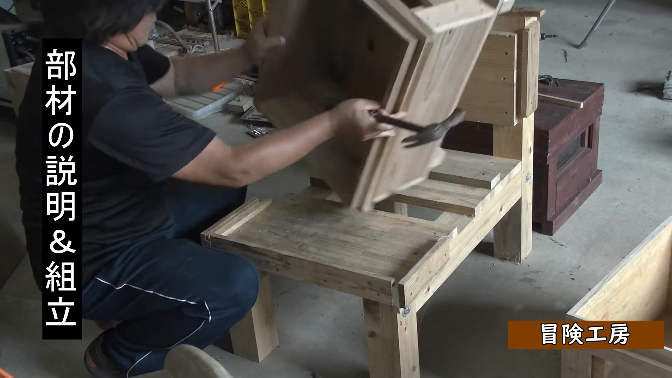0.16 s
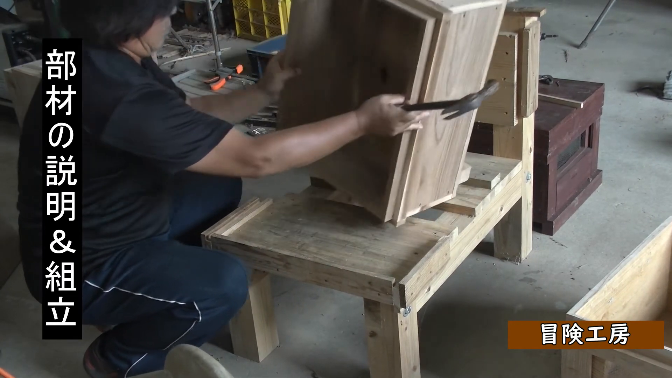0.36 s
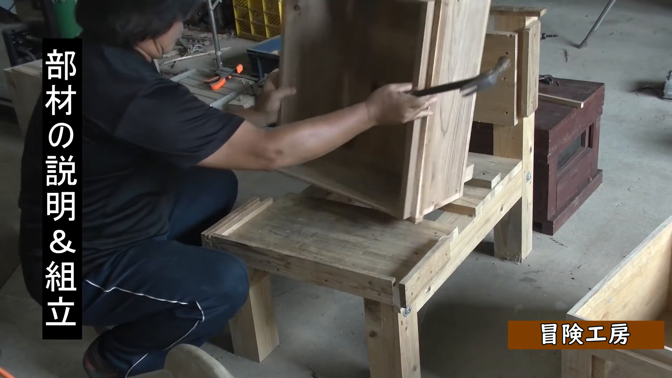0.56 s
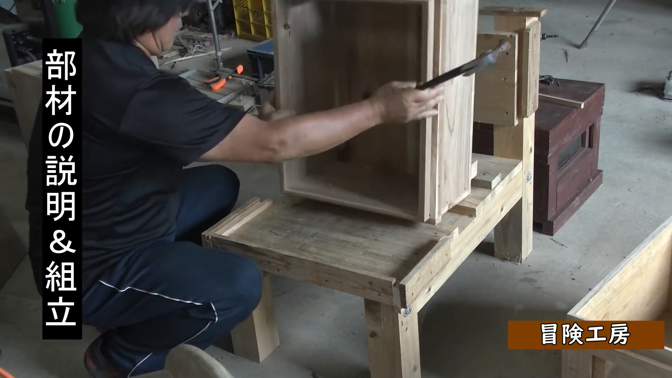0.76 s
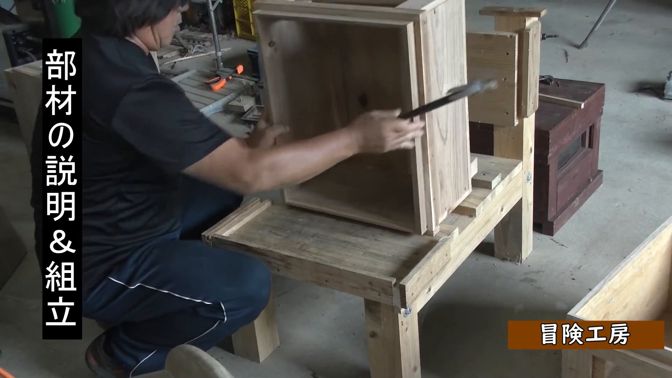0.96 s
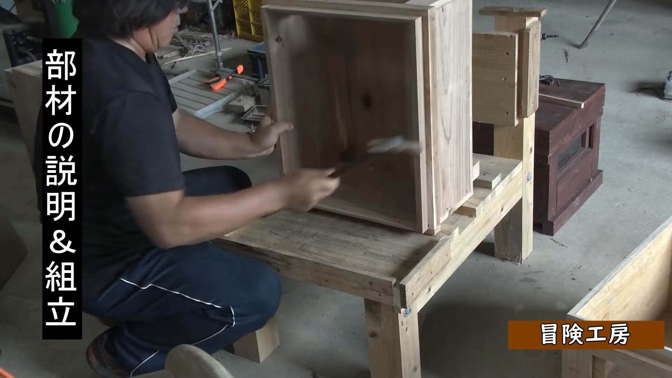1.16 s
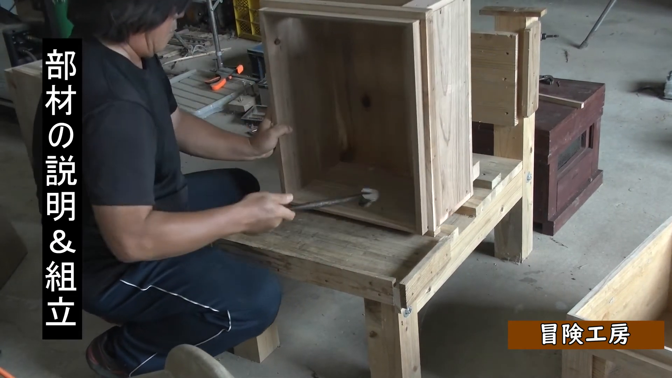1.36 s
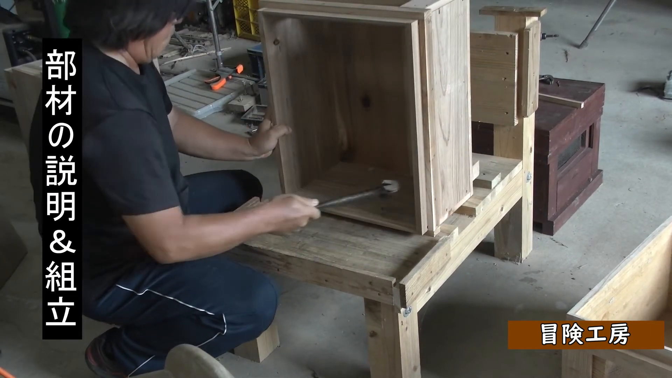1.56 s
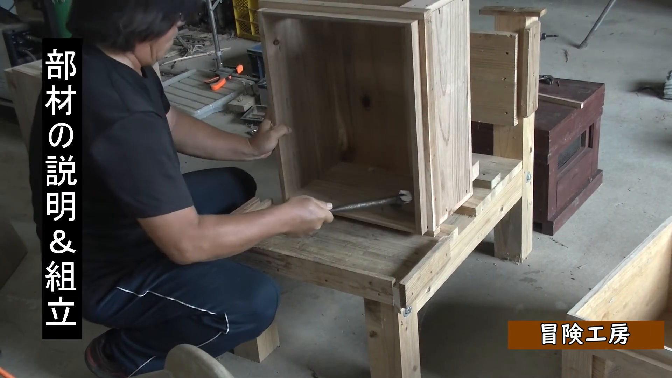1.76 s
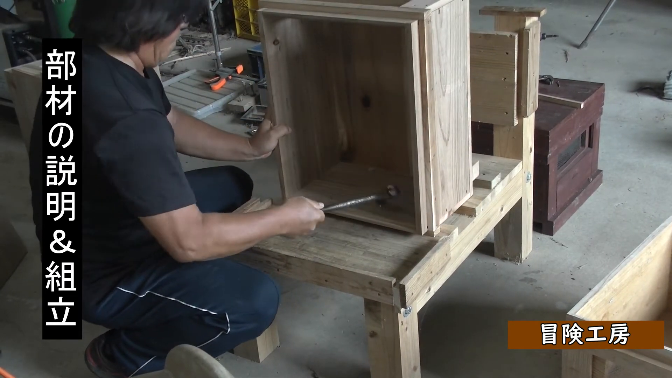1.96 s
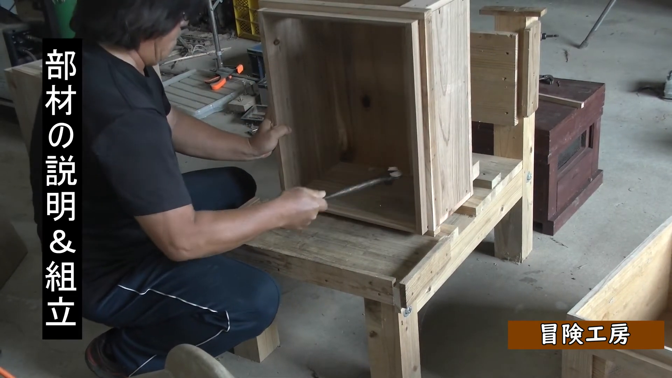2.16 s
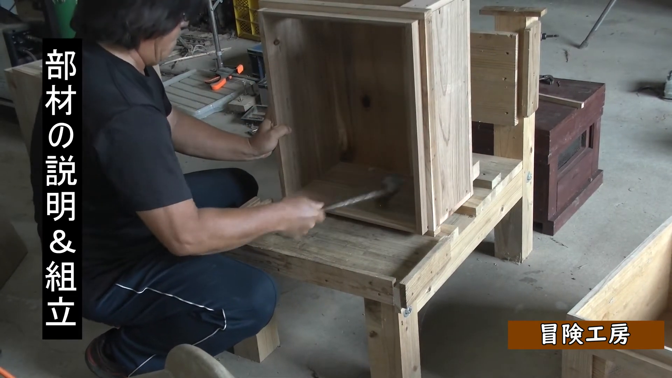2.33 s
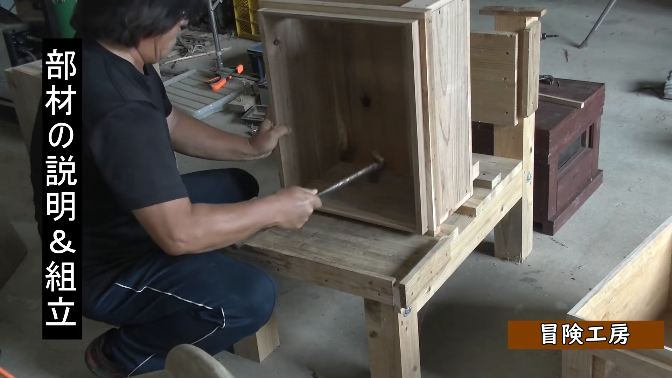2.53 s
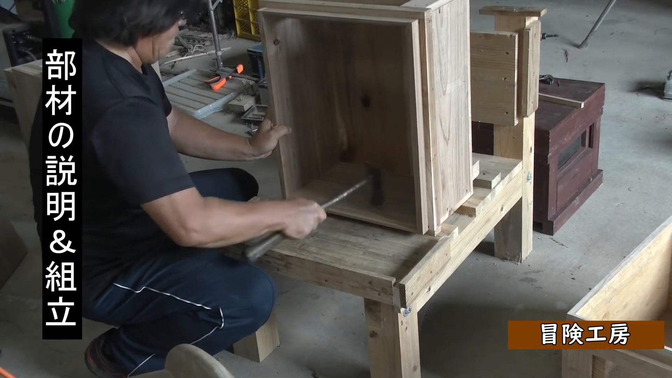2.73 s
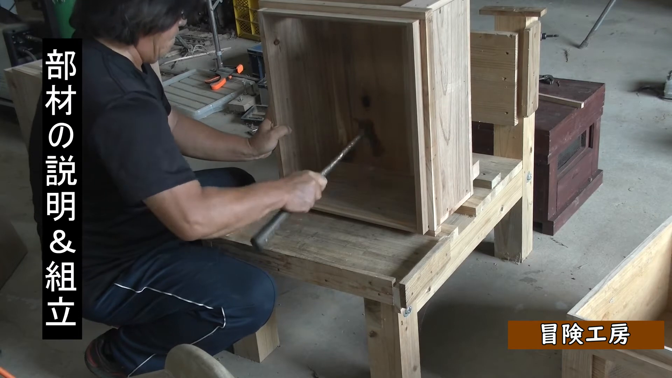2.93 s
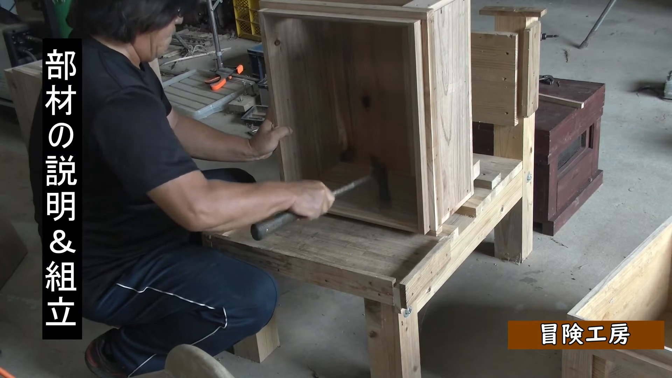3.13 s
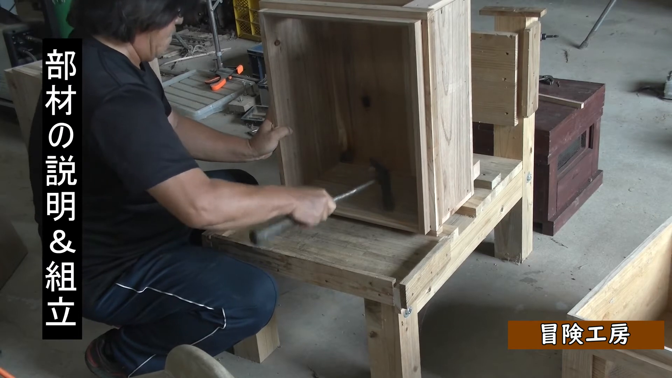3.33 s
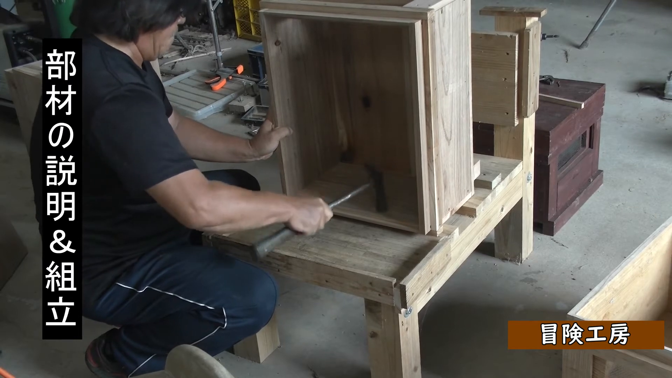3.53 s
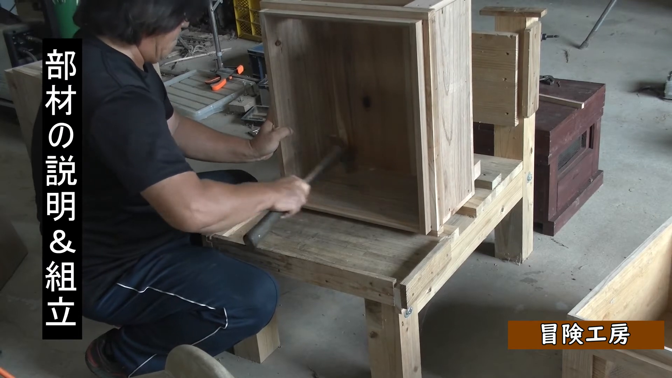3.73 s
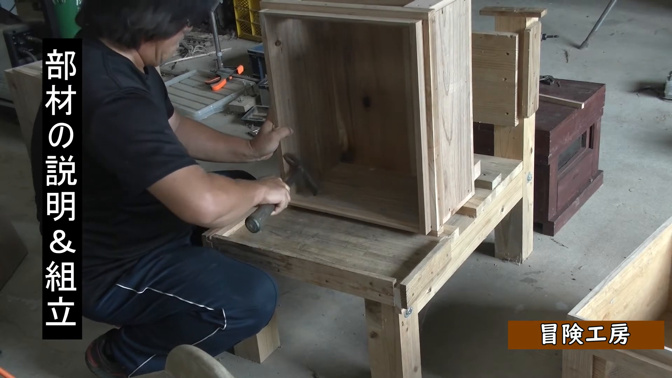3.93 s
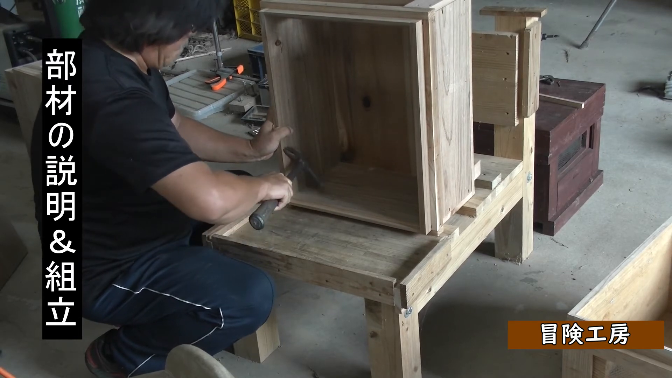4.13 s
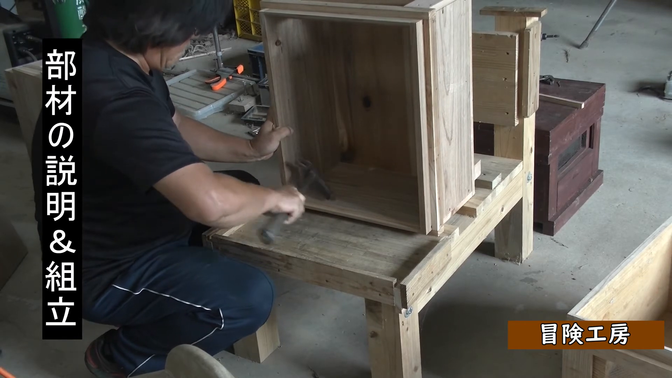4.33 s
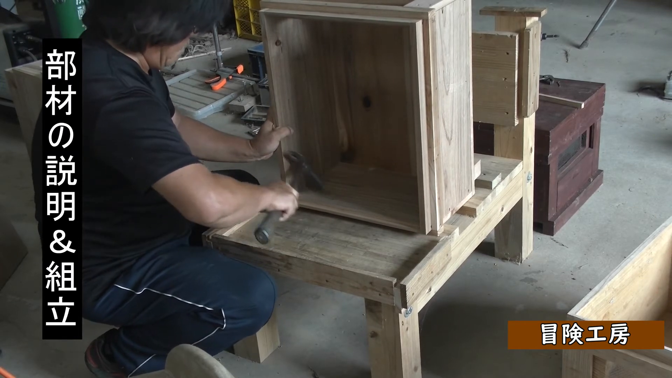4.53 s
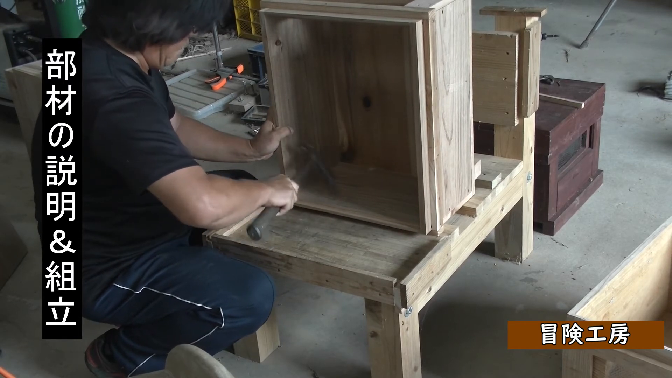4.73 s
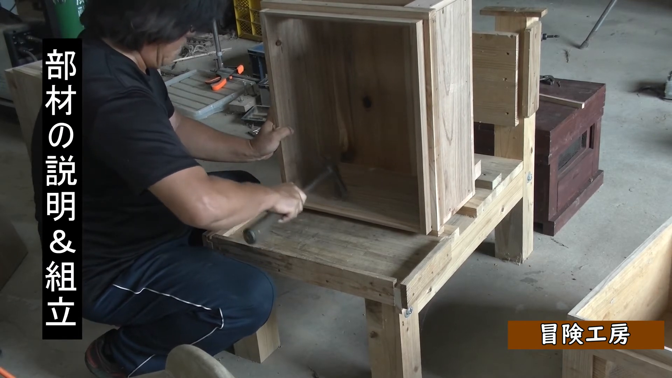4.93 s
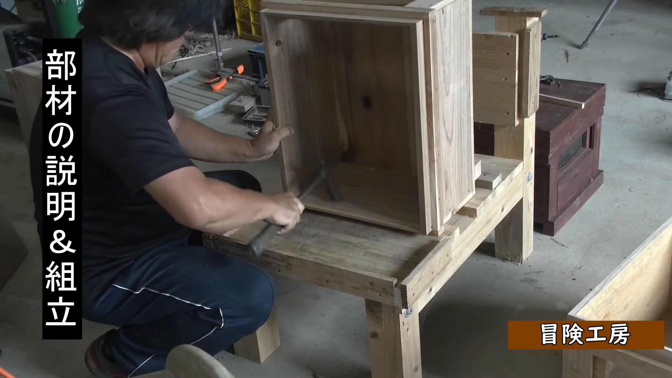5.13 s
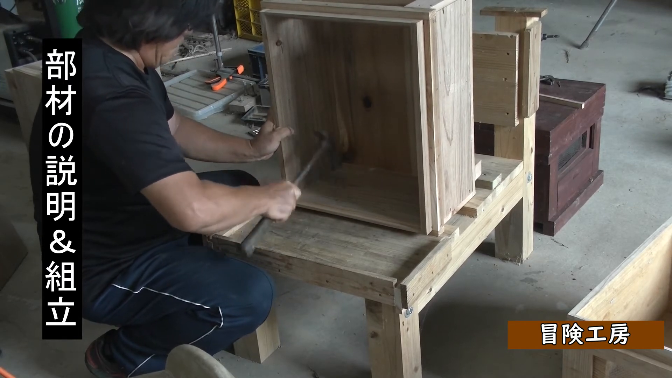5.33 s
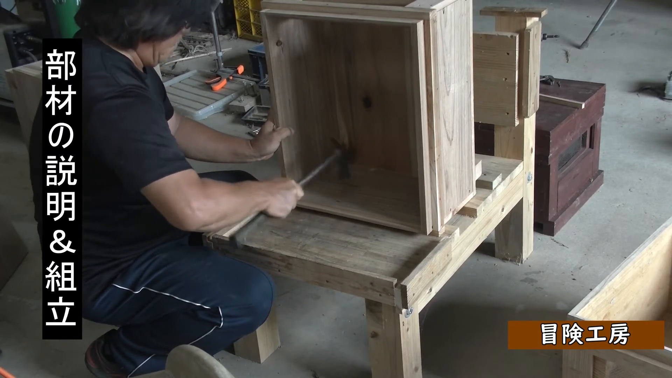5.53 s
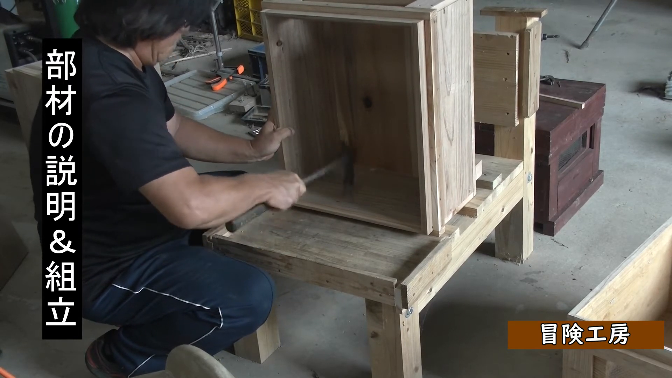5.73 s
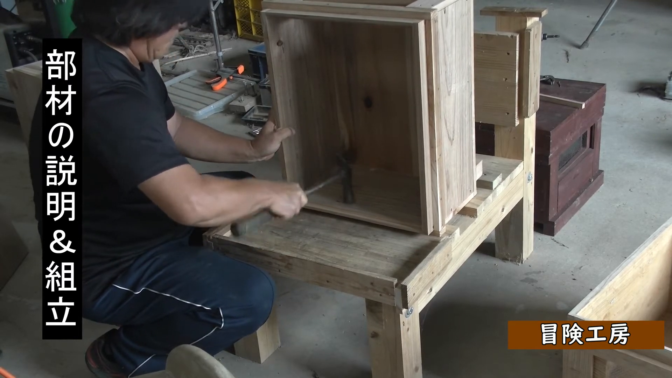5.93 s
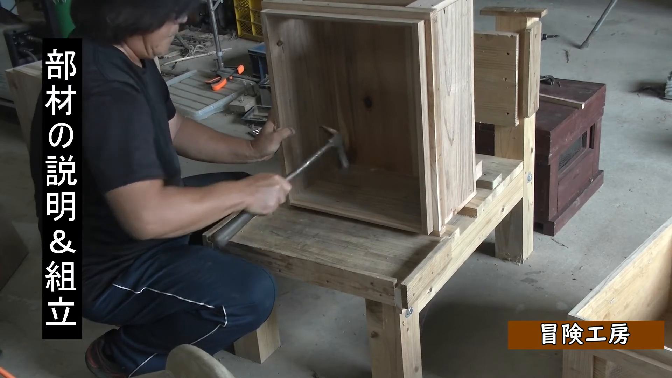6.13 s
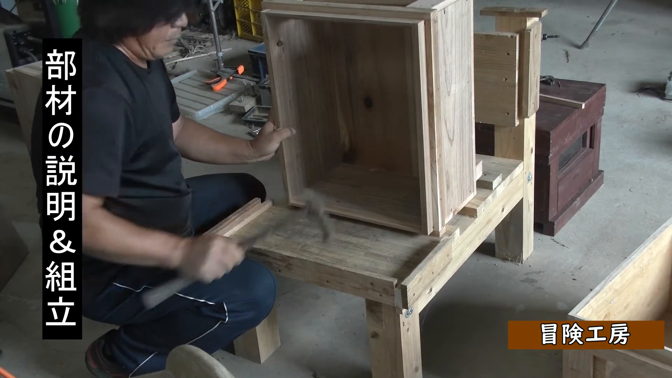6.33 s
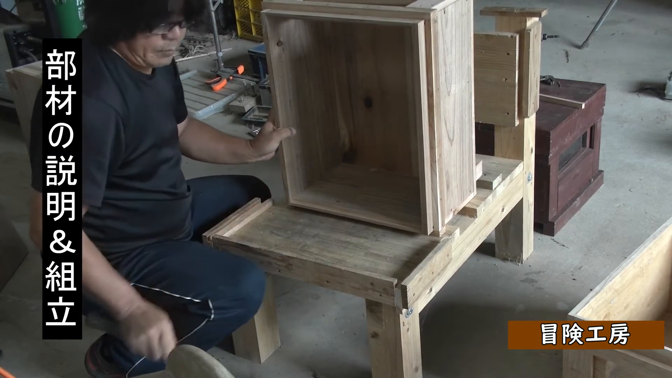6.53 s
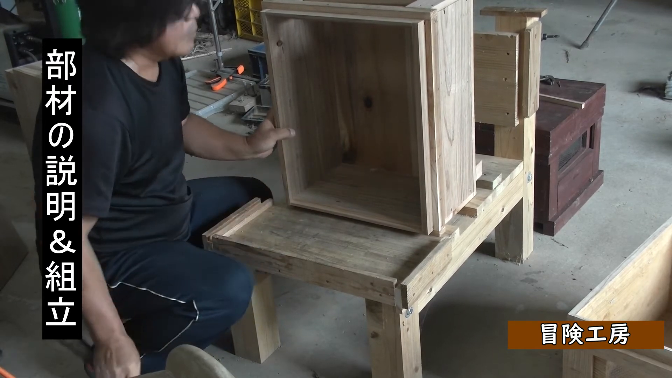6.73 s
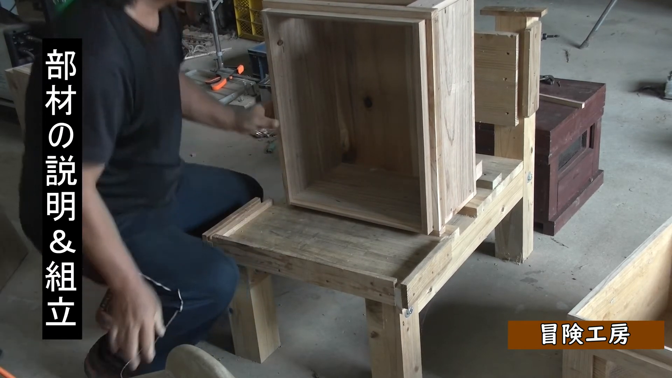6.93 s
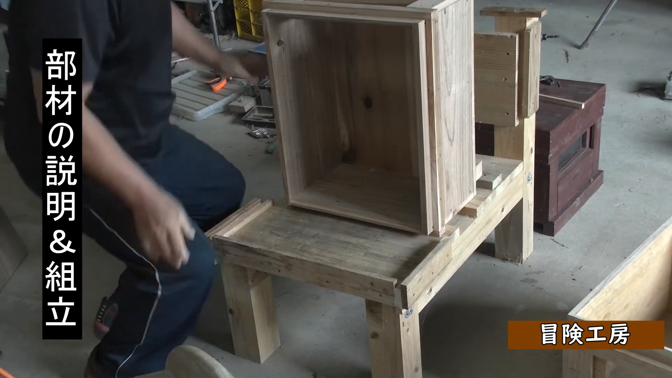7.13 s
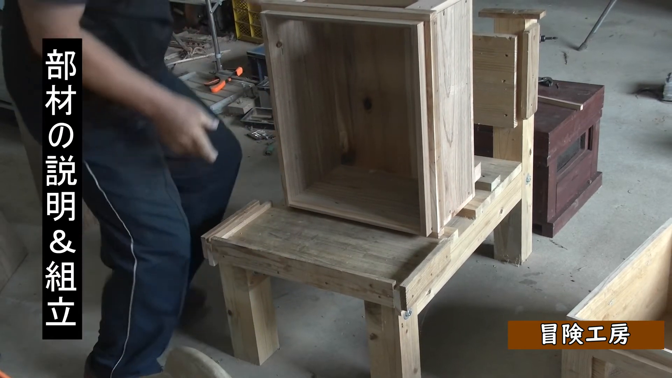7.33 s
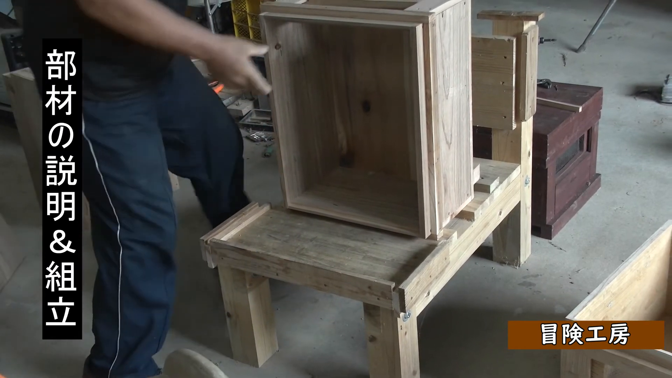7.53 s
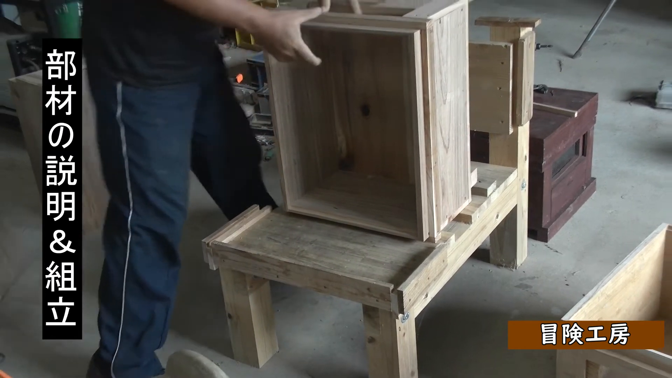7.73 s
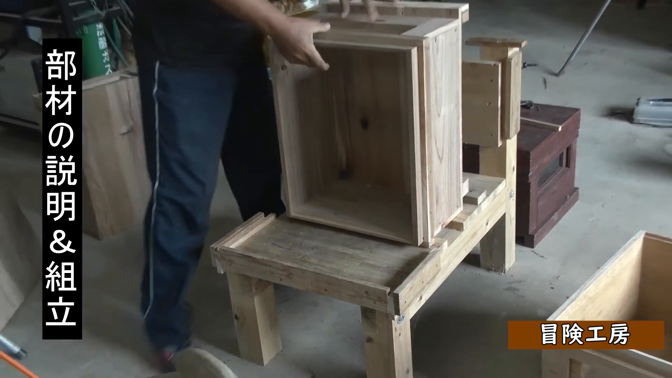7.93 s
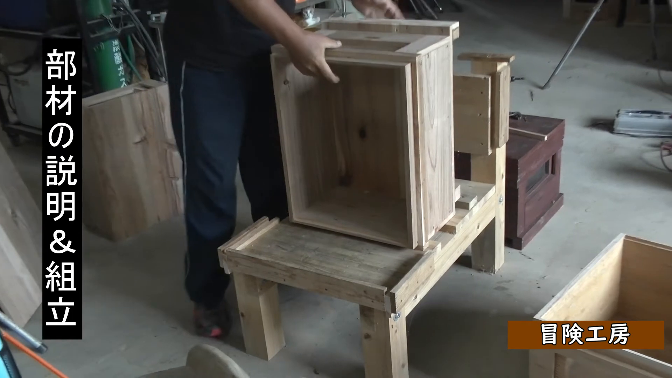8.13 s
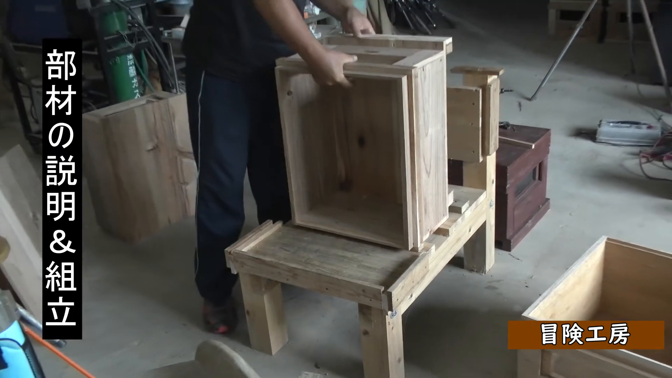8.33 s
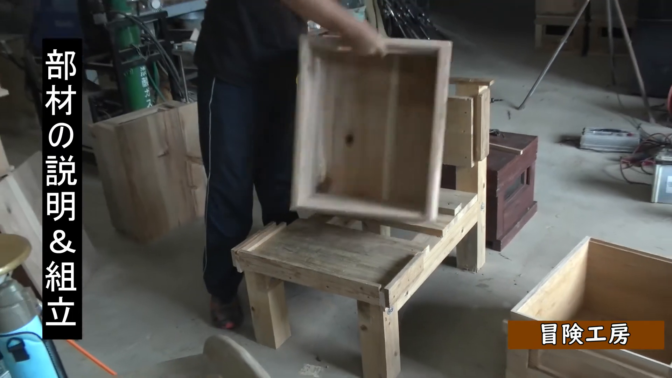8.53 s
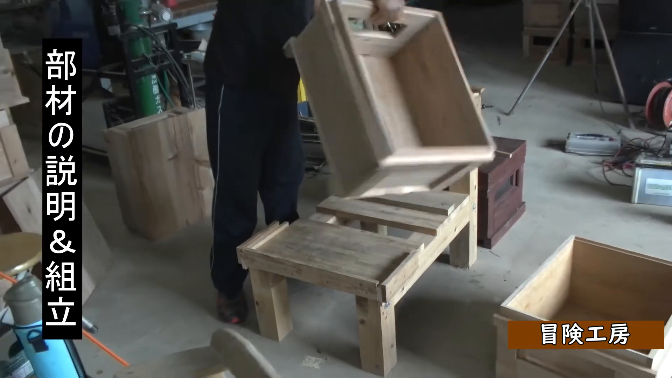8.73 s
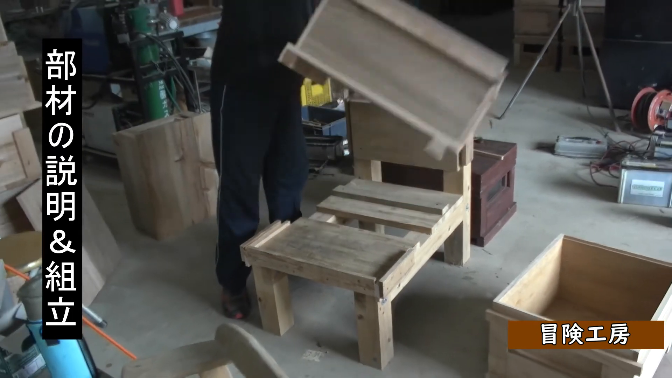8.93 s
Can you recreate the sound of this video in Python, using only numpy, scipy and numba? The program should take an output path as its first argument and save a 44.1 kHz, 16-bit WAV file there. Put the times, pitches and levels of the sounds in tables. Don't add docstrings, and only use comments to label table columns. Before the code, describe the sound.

Loud hollow hammer blows on a wooden box ring through a large hard-walled workshop, followed by a hammer clatter, soft steps and scraping wood over insects.

```python
import sys
import numpy as np
from scipy import signal
from scipy.fft import rfft, irfft, next_fast_len
from scipy.io import wavfile
from scipy.ndimage import uniform_filter1d
from numba import njit

SR = 44100
rng = np.random.default_rng(int(sys.argv[2]) if len(sys.argv) > 2 else 0)


def int16_out(signal):
    q = np.round(np.clip(np.atleast_2d(signal).T, -1, 1) * 32767)
    wavfile.write(sys.argv[1], SR, q.astype(np.int16))


def elevation(decibels):
    levels = np.asarray(decibels, float)
    return 10 ** (levels / 20)


N = 399987


def level(x, db):
    return x * elevation(db) / np.sqrt(np.mean(x ** 2))


def shape(x, hz, db):
    size = next_fast_len(x.shape[-1])
    f = np.log(np.maximum(np.arange(size // 2 + 1) * SR / size, 1))
    return irfft(rfft(x, size) * elevation(np.interp(f, np.log(hz), db)), size)[..., :x.shape[-1]]


def walk(rate):
    k = int(SR / rate)
    held = np.repeat(rng.standard_normal(N // k + 1), k)
    return 1.6 * uniform_filter1d(uniform_filter1d(held, k), k)[:N]


def decay(t, t60):
    return np.exp(-np.log(1000) * t / t60)


def stroke(start, length, edge_s):
    t = np.arange(N) / SR - start
    gate = np.clip(np.minimum(t, length - t) / edge_s + 1, 0, 1)
    return gate ** 2, np.clip(t / length, 0, 1) - .5


def ring(modes, chance, t):
    hz, db, t60 = np.transpose(modes)[:, :, None]
    pitch, strength, phase = chance[:, :len(modes), None]
    hz = hz * (1 + 0.026 * pitch)
    gain = elevation(db + 2.5 * strength)
    x = np.sum(gain * np.sin(2 * np.pi * hz * t + phase) * decay(t, t60), axis=0)
    return x / np.max(np.abs(x))


# frequency in Hz, level in dB, t60 in seconds.
PANEL_MODES = [(439, -8.5, 0.029), (680, -9.5, 0.067), (844, -16, 0.1), (998, -1.5, 0.016),
               (1647, -2.5, 0.024), (2057, -14.5, 0.048), (2740, -8.5, 0.026), (3170, -12, 0.0064)]
STEEL_MODES = [(3760, -31, 0.0035), (4500, -35, 0.02), (5400, -25, 0.014), (6600, -7, 0.034),
               (8570, -31, 0.0023), (10170, 25, 0.019), (12800, -35, .004)]


def hits(rows, body, gain_db, rise_s, note_db, crack_db, crack_s, boom_db=0, shine_db=0,
         note_per_blow=0, note_s=0.018, colour_db=0, spots=None):
    out, t = np.zeros((9, N + SR)), np.arange(SR // 4) / SR
    for k, (s, db, thump_db, click_db, hz, hall_db) in enumerate(rows):
        chance, noise = rng.standard_normal((3, 10)), rng.standard_normal(len(t))
        lift_db, top_hz, top_db, bass_db, edge_db = spots[k] if spots else (0, hz, -60, 0, 0)
        thump_db = thump_db + lift_db
        hit_db = db + gain_db

        crack = noise * np.exp(-t / crack_s)
        notes = [(hz, note_db + note_per_blow * db, note_s), (top_hz, top_db, 0.012)]
        panel = ring(PANEL_MODES + notes, chance, t)
        panel = panel + elevation(crack_db) * uniform_filter1d(uniform_filter1d(crack, size=6), size=4)
        thump = ring(body, chance, t) * (1 - np.exp(-t / 0.004))
        click = ring(STEEL_MODES, chance, t) + elevation(9.0) * uniform_filter1d(crack, size=3)
        click = click * (1 - np.exp(-t / 0.00027))
        x = panel * (1 - np.exp(-(t / rise_s) ** 2))
        x = x + elevation(thump_db) * thump + elevation(click_db - 16.0) * click

        i, spot = int(s * SR) - 35, 1 + 4 * (k % 2)
        out[0, i:i + len(t)] += elevation(hit_db) * x
        push = noise[::-1] * np.exp(-t / 0.0012)
        push = push / np.sqrt(np.sum(push ** 2))
        parts_db = np.array([thump_db + boom_db + bass_db, 0, click_db + shine_db, edge_db])
        push_gain = elevation(hit_db + hall_db + parts_db)
        out[spot:spot + 4, i] += 0.89 * push_gain
        out[spot:spot + 4, i:i + len(t)] += 0.25 * push_gain[:, None] * push
        out[spot + 1, i:i + len(t)] += elevation(hit_db + hall_db + colour_db - 30) * x * np.exp(-t / 0.004)
    return out[:, :N]


def with_thump(rows, db):
    return np.insert(np.array(rows, float), 2, db, axis=1)


def with_click(rows, db):
    return np.insert(np.array(rows, float), 3, db, axis=1)


# start in seconds, blow in dB, click in dB, panel note in Hz, hall in dB.
BLOWS = [(1.977, -3, -14, 1210, -13.5), (2.376, -6.5, -11.5, 1710, -15.5), (2.739, 7, -37, 1294, -12),
         (3.062, 6, -28, 1410, -12.5), (3.122, -3.5, -26, 1320, -18), (3.325, 6.5, -19, 1350, -13),
         (3.566, 9.5, -29.5, 1316, -15), (4.318, -4, -15.5, 1290, -15), (4.604, -10, -9.5, 1040, -16),
         (4.898, -6.5, -6, 1310, -17.5), (5.169, 2, -20.5, 1260, -17.5), (5.421, -2, -22, 1274, -17.5),
         (5.653, 0, -32, 1344, -10.5), (5.914, 11, -22, 1260, -15.5)]
# thump in dB, upper note in Hz, upper note in dB, hall bass in dB, hall edge in dB.
BLOW_SPOTS = [(5.5, 2100, -20.5, -4, -37), (9, 3400, 10, -6.5, 4), (2.5, 3380, -4.5, -4, 0.5),
              (2.5, 4640, -8.5, -3, -10), (3.5, 1600, -17, 0.5, -17), (0, 3300, -7, -2, 2.5),
              (5, 300, -18, -7, -2.5), (3, 2700, -19, 1.5, -28), (8.5, 2870, 1, -2.5, -16),
              (6, 440, -13, 4.5, -16), (2.5, 2800, 0, -1, -3), (7, 3490, 0.5, -1.5, 7.5),
              (0, 4270, -4.5, 1, 0), (-7.5, 2500, -2, 6.5, 6)]
# frequency in Hz, level in dB, t60 in seconds.
BOX_MODES = [(139, -8, 0.27), (195, 10, 0.033), (225, -13.5, 0.18), (307, -21, 0.1), (341, 21, 0.048),
             (483, 4.5, 0.075)]


def hammer_blows():
    thump_db = -18.5 - 0.13 * np.array(BLOWS)[:, 1]
    return hits(with_thump(BLOWS, thump_db), BOX_MODES, 16, rise_s=0.0012, note_db=6.5, crack_db=-16.0,
                crack_s=0.0032, note_per_blow=0.48, shine_db=-7.0, spots=BLOW_SPOTS)


# start in seconds, knock in dB, thump in dB, panel note in Hz, hall in dB.
KNOCKS = [
    (0.684, 3, -5.5, 1226, -21),
    (0.929, -1, -8, 574, -15),
    (0.9465, 1, -8, 1240, -35),
    (0.969, -21.5, -9.5, 402, -10),
    (1.137, -28, 17.5, 1230, -24),
    (1.179, -40, -5, 437, -21),
    (1.254, -22, 5.5, 670, -26),
    (1.344, -22.5, -1, 487, -32),
    (1.431, -34, 8, 460, -46),
]
# start in seconds, touch in dB, click in dB, panel note in Hz, hall in dB.
TOUCHES = [
    (0.357, -7, -16.5, 1190, -16),
    (1.107, -15, -30, 398, -16),
    (7.382, -22.5, -13, 722, -13),
    (7.799, -27, -7, 700, -6),
    (8.749, -32, -6, 702, -22),
]
# frequency in Hz, level in dB, t60 in seconds.
BENCH_MODES = [(70, 15, 0.064), (145, 11.5, 0.13), (188.5, 13, 0.37), (272, -2, 0.16), (326.5, 13, 0.34),
               (542.7, 12.5, 0.11), (662, 3.5, 0.096)]


def bench_knocks():
    bench = np.vstack([with_click(KNOCKS, -24.5), with_thump(TOUCHES, -17)])
    bench = bench[bench[:, 0].argsort()]
    return hits(bench, BENCH_MODES, 0.18, rise_s=0.0016, note_db=6.0, crack_db=-18.5, crack_s=0.011)


# start in seconds, level in dB, click in dB, note in Hz, hall in dB.
JOLT = [
    (7.8654, -6, -26, 2820, -9),
]
# frequency in Hz, level in dB, t60 in seconds.
RIM_MODES = [(509, -2.5, 0.086), (673, -13.5, 0.37), (700, 10.5, 0.031), (789, -8.5, 0.17),
             (990, -2, 0.059), (1210, 2.5, 0.051)]


def box_jolt():
    return hits(with_thump(JOLT, 8), RIM_MODES, 16, rise_s=0.00025, note_db=9, crack_db=-9, crack_s=0.006,
                boom_db=-48, shine_db=9.0, note_s=0.0083, colour_db=-1)


# start in seconds, level in dB, click in dB, note in Hz, hall in dB.
TICKS = [
    (4.395, -13.5, -18, 680, -34),
    (4.419, -12.5, -31, 680, -18),
    (4.467, -11.5, -18.5, 605, -25),
    (4.631, -17, -48, 770, -41),
    (4.712, -22, -8, 680, -30),
    (4.935, -14, -13, 1380, -41),
    (6.973, -20, -9.5, 802, -23),
    (7.223, -23, -7, 909, -9),
    (7.8605, -11, -41, 630, -18),
    (8.423, -20, -7, 1537, -17),
]


def small_ticks():
    return hits(with_thump(TICKS, -30), BOX_MODES, 5.0, rise_s=0.00079, note_db=8.5, crack_db=-10.5,
                crack_s=0.0062)


# frequency in Hz, level in dB, t60 in seconds.
FACE_MODES = [(4200, -11, .1), (5600, 4, .03)]
# start in seconds, level in dB, click in dB, note in Hz, hall in dB.
CLINKS = [
    (4.661, -6.5, -15, 3930, -21),
]


def steel_clinks():
    return hits(with_thump(CLINKS, -40), FACE_MODES, 5.9, rise_s=0.0012, note_db=-4.0, crack_db=-1.0,
                crack_s=0.003, note_s=0.019, boom_db=3)


# start in seconds, level in dB, click in dB, note in Hz, hall in dB.
SNAPS = [
    (7.1055, -15, -14, 3500, -33),
]
# thump in dB, upper note in Hz, upper note in dB, hall bass in dB, hall edge in dB.
SNAP_SPOT = (0, 5800, 24, 0, -2)


def steel_snaps():
    return hits(with_thump(SNAPS, -40), FACE_MODES, 5.3, rise_s=0.00031, note_db=30, crack_db=-31,
                crack_s=0.0024, note_s=0.01, shine_db=7, spots=[SNAP_SPOT])


# start in seconds, level in dB, click in dB, note in Hz, hall in dB.
DROPS = [
    (6.726, -45, -27, 2230, -27),
    (6.851, -15, -16, 2060, -2),
    (6.867, -9, -19, 1080, -22),
    (6.889, -13, -27, 1800, -22),
    (7.003, -7.5, -13.5, 2130, -11.5),
    (7.029, -16, -22, 1830, -27),
]
# thump in dB, upper note in Hz, upper note in dB, hall bass in dB, hall edge in dB.
FLOOR_SPOT = (-4, 5500, -7, -2, 9.5)
# frequency in Hz, level in dB, t60 in seconds.
SOLE_MODES = [(70, -13, .03), (123, 0, 0.064), (196, 4.5, 0.045), (284, 3.5, 0.03)]


def hammer_laid_down():
    return hits(with_thump(DROPS, -31), SOLE_MODES, 1.85, rise_s=0.00032, note_db=7.5, crack_db=-7.0,
                crack_s=0.0092, note_s=0.025, spots=[FLOOR_SPOT] * len(DROPS))


# start in seconds, level in dB, thump in dB, note in Hz, hall in dB.
STEPS = [
    (7.534, -22.5, 7, 410, -39),
    (7.668, -22, 4.5, 310, -52),
    (7.224, -37.5, 10, 400, -35),
]


def footsteps():
    return hits(with_click(STEPS, -21), SOLE_MODES, 1.96, rise_s=0.0011, note_db=15, crack_db=-8.0, crack_s=0.0054)


# start in seconds, frequency in Hz, level in dB, t60 in seconds.
PINGS = [
    (2.421, 4780, -27, .04),
    (4.664, 4170, -41, .5),
    (4.655, 9800, -30, .03),
    (8.9, 4980, -58, .3),
    (8.91, 5700, -60, .2),
]


def pings():
    out, sway = np.zeros(N), walk(37)
    for s, hz, db, t60 in PINGS:
        t = np.maximum(np.arange(N) / SR - s, 0)
        tone = np.sin(2 * np.pi * hz * t) * decay(t, t60)
        out += elevation(db + 2.6 * sway) * tone * (1 - np.exp(-t / 0.0017))
    return out


def stick_slip():
    return rng.standard_normal(N) * elevation(2 * rng.exponential(size=N)) * (rng.random(N) < .5)


# start in seconds, length in seconds, level in dB, swell along the stroke in dB,
# share above 1.5 kHz in dB.
SLIDES = [
    (0.873, 0.05, -47, 14, -14),
    (1, 0.078, -25.5, -4, -20),
    (1.107, 0.096, -27, -11, -22),
    (1.247, 0.041, -27.5, -7, -23),
    (1.313, 0.23, -42, -14, -8),
    (7.7, 0.062, -46, 14, -4),
    (7.797, 0.085, -36, 0.5, -2.5),
    (8.45, 0.13, -51, -6, 5.5),
    (8.603, 0.13, -46, -7, -3.5),
    (8.783, 0.058, -54, -1, -14),
]


def slides(ticks):
    dull = level(shape(ticks, [80, 190, 320, 700, 1300, 2500], [11.0, 12.0, 10.0, 7.0, -2.0, -65.0]), 0)
    bright = level(shape(ticks, [900, 1900, 2800, 4200, 7000, 11000, 15000],
                         [-32, 2, -1.5, -9.5, -13, -55, -53]), 0)
    out, grip_db = 0, .8 * walk(30)
    for s, length, db, swell_db, bright_db in SLIDES:
        gate, along = stroke(s, length, 0.027)
        mix = dull * np.sqrt(1 - min(elevation(2 * bright_db), .95)) + bright * elevation(bright_db)
        out = out + mix * gate * elevation(db + swell_db * along + grip_db - 2.5)
    return out


# start in seconds, length in seconds, level in dB, swell in dB.
SQUEAKS = [
    (0.875, 0.05, -33, 4),
]
# frequency in Hz, level in dB.
SQUEAK_TONE = [(1500, -25), (1950, 5), (2300, -9), (2750, 3), (3150, -18), (3500, -3.5), (4100, -22),
               (4700, -18), (5600, -33.5)]


def edge_squeaks(ticks):
    out, rasp = 0, level(shape(ticks, *np.transpose(SQUEAK_TONE)), 0)
    for s, length, db, swell_db in SQUEAKS:
        gate, along = stroke(s, length, 0.027)
        out = out + rasp * gate * elevation(db + swell_db * along)
    return out


# start in seconds, length in seconds, level in dB.
BRUSHES = [
    (7.8, .06, -54),
    (7.993, .03, -53),
]


def brushes(ticks):
    cloth = level(shape(ticks, [5980, 8530, 10000, 11900, 14000], [-29, -8, -4, -13, -34]), 0)
    return cloth * sum(stroke(s, length, 0.027)[0] * elevation(db) for s, length, db in BRUSHES)


# delay in seconds, level in dB.
BOUNCES = [(.0045, -12.5), (.008, -13.5), (.013, -15)]


def near_reflections(near):
    soft = uniform_filter1d(near, size=4)
    return sum(elevation(db) * np.roll(soft, int(s * SR)) for s, db in BOUNCES)


# frequency in Hz, level in dB.
SPREAD = [
    [(60, -38), (130, -27.5), (185, -2.5), (220, -4.5), (310, -1), (370, -10), (440, 0), (540, -13),
     (900, -20.5), (3000, -50)],
    [(200, -94), (550, -27.5), (680, -8.5), (850, -11), (1300, -9), (1800, -7.5), (2700, -22),
     (3450, -19.5), (4000, -39.5), (6500, -40.5), (15000, -111)],
    [(1000, -31), (3500, 2.5), (5000, -2.5), (6700, -2.5), (8300, -29), (10000, -2.5), (12000, -16),
     (16000, -30)],
    [(900, -41), (1900, -9), (2700, -1), (3500, -12), (4200, -16), (6500, -20), (9000, -78)],
]


def radiate(far):
    far = np.reshape(far, (2, 4, N))
    parts_db = (34.16, 24.65, 19.0, 14.4)
    return sum(shape(far[:, k], *np.transpose(SPREAD[k])) * elevation(db) for k, db in enumerate(parts_db))


# start in seconds, frequency in Hz, level in dB, width in Hz.
TINTS = [(.357, 300, -2, 249), (.357, 2212, -14, 1480), (.357, 6000, -20, 1998), (.684, 635, 8, 200),
         (.684, 1030, 3, 120), (.95, 1150, 2, 300), (.95, 5950, -27, 2500), (1.977, 1040, 13.5, 120),
         (1.977, 1630, 7, 333), (1.977, 2750, 13, 250), (2.376, 700, 7.5, 201), (2.376, 1660, 6, 247),
         (2.376, 2020, 11, 250), (2.376, 2740, 1.5, 300), (2.376, 3350, 11.5, 200), (2.376, 3650, 2, 150),
         (2.739, 1320, 24, 200), (2.739, 440, 19.5, 60), (3.062, 1900, 18, 396), (3.325, 458, 27.5, 49.7),
         (3.325, 1690, 23.5, 250), (3.566, 439, 26.5, 49.5), (4.318, 1730, 11, 250), (4.318, 3400, 7, 302),
         (4.66, 2900, 7, 300), (4.66, 1540, -4.5, 201), (4.898, 1800, 4, 150), (4.898, 6500, 5, 600),
         (5.169, 1860, 21, 298), (5.169, 680, 20.5, 150), (5.421, 1230, 13.5, 300), (5.421, 1720, 12, 400),
         (5.421, 640, 13, 150), (5.653, 430, 25.5, 49.7), (5.653, 1570, 18, 400), (5.914, 459, 27, 50),
         (5.914, 1900, 22, 390), (6.867, 540, -0.5, 150), (7.003, 510, -11.5, 200), (7.105, 5300, -9, 900),
         (7.8654, 686, 19, 70), (7.8654, 545, 15, 79), (7.8654, 910, 9, 200), (7.8654, 2970, 14.5, 700),
         (8, 186, 7.5, 50)]


def tints():
    out, t = np.zeros((2, N + SR)), np.arange(SR // 10) / SR
    for k, (s, hz, db, width) in enumerate(TINTS):
        i = int(s * SR)
        tone = np.cos(2 * np.pi * hz * t) * np.exp(-np.pi * width * t)
        out[k % 2, i:i + len(t)] += elevation(db) * 2 * np.pi * width / SR * tone
    return shape(out[:, :N], [90, 190], [-25, 0])


# frequency in Hz, t60 in seconds, level in dB, side share in dB.
HALL = [(78.5, 0.92, 17, -18), (176.6, 0.93, -4.5, -40), (338, 0.9, 6.5, -21), (694, 0.98, -3, -50),
        (1290, 0.98, -3.5, -50), (2820, 1.04, -10.5, -8.5), (4500, 1.09, -14, -6.5),
        (9300, 0.54, -8.5, -10), (12000, 0.37, -17.5, 10)]
# frequency in Hz, level in dB, t60 in seconds.
STANDING = [(188.6, -25, 0.7), (248.6, -33, 0.73), (302, -14.5, 0.27), (449.3, -29, 1)]
# delay in seconds, level in dB, spread in seconds.
ECHOES = [(0.024, 5.5, 0.0069), (0.039, 1.5, 0.0043), (.066, -2.5, .008), (0.103, -1.5, 0.012)]


def hall(x):
    t = np.arange(int(1.6 * SR)) / SR
    hz, t60, db, side_db = np.transpose(HALL)
    noise, tail = rng.standard_normal((2, len(t))), 0
    grid = np.geomspace(40, 20000, num=200)
    size = int(0.008 * SR)
    for k in range(len(hz)):
        share = np.interp(np.log(grid), np.log(hz), np.arange(len(hz)) == k)
        band = shape(noise, grid, 20 * np.log10(share + 1e-3))
        grain = np.sqrt(size) * uniform_filter1d(np.roll(noise[1], 5000 * (k + 1)), size)
        band = band * elevation(1.8 * grain)
        tail = tail + band * elevation([[db[k]], [db[k] + side_db[k]]]) * decay(t, t60[k])
    for f, d, ring_s in STANDING:
        tail[0] += elevation(d) * np.sin(2 * np.pi * f * t) * decay(t, ring_s)
    tail *= elevation(sum(d * np.exp(-((t - s) / w) ** 2) for s, d, w in ECHOES))
    tail *= 1 - np.exp(-(t / 0.028) ** 2)
    mid, side = signal.fftconvolve(x[None], tail * elevation(-16.5), axes=1)[:, :N]
    return np.array([mid + side, mid - side])


# frequency in Hz, left minus right in dB.
LEAN = [(60, 0.5), (110, -2), (200, 0.5), (380, -1.5), (700, -3), (1290, -3.5), (2380, -2.5), (4400, 2.5),
        (8120, -2.5), (15000, 7)]


def lean(wood):
    hz, lean_db = np.transpose(LEAN)
    return np.array([shape(wood[0], hz, lean_db / 2), shape(wood[1], hz, -lean_db / 2)])


# pitch ratio, level in dB.
SONGS = [(.98, -10), (1, 0), (1.02, -11)]
# harmonic number, level in dB.
OVERTONES = [(1, -13), (2, -3.5), (3, 5.5)]
# start in seconds, length in seconds, level in dB, third overtone in Hz.
PHRASES = [(.12, 0.033, -47, 3240), (0.215, 0.1097, -46, 3310), (0.525, 0.029, -49, 3330),
           (1.313, 0.13, -50.5, 3280), (1.663, 0.066, -52, 3355), (4.131, .17, -44.5, 3370),
           (6.468, 0.1, -43.5, 3316), (6.718, 0.036, -44.5, 3310), (6.795, .06, -49.5, 3350),
           (7.131, 0.22, -45, 3396), (7.529, 0.15, -43, 3330), (7.683, 0.1, -50.5, 3410),
           (8.085, 0.11, -42.5, 3480), (8.196, 0.083, -43, 3240), (8.621, 0.13, -40.5, 3330),
           (8.741, 0.083, -45, 3290), (8.899, 0.06, -42.5, 3296), (8.991, 0.12, -41.5, 3440)]


def cicadas():
    out, bed = 0, elevation(-53 + 3 * walk(9.9))
    gains = np.array([bed] + [stroke(s, length, 0.03)[0] * elevation(db) for s, length, db, hz in PHRASES])
    rate_hz = np.array([3290] + [row[-1] for row in PHRASES])[gains.argmax(axis=0)] / 3
    rate_hz = uniform_filter1d(rate_hz, size=2500)
    for ratio, db in SONGS:
        waver = 1 + .002 * walk(6) + .007 * walk(260)
        phase = 2 * np.pi * np.cumsum(ratio * rate_hz * waver) / SR
        song = sum(elevation(d) * np.sin(k * phase) for k, d in OVERTONES)
        pan_db = 2 * rng.standard_normal()
        out = out + song * elevation(db + 4 * walk(7) + 2 * walk(60)) * elevation([[pan_db], [-pan_db]])
    out = out / np.sqrt(uniform_filter1d(np.mean(out ** 2, axis=0), size=4000))
    return out * gains.max(axis=0)


# frequency in Hz, level in dB per Hz.
AIR = [(24, -60), (40, 12), (199, -6.5), (479, -2.5), (896, -9), (1150, 3), (1720, -9), (2210, 1.5),
       (2910, -1), (3300, 5), (3740, -10.5), (6820, -1.5), (8550, -17.5), (14500, -24), (16000, -61)]


def air():
    hz, db = np.transpose(AIR)
    mid = shape(rng.standard_normal(N), hz, db)
    side = shape(shape(rng.standard_normal(N), hz, db), [100, 1000, 4000, 12000], [-1.0, -10.5, -7, 0.5])
    return level(np.array([mid + side, mid - side]) * elevation(2.0 * walk(1.746)), -45.5)


def scene():
    near, *far = (hammer_blows() + bench_knocks() + box_jolt() + small_ticks() + steel_clinks()
                  + steel_snaps() + hammer_laid_down() + footsteps())
    feeds = radiate(far) + tints()
    ticks = stick_slip()
    friction = slides(ticks) + edge_squeaks(ticks) + brushes(ticks)
    wood = near + near_reflections(near) + friction + hall(feeds[0]) + hall(feeds[1])
    return lean(wood) + cicadas() + air() + pings()


@njit
def follow(x, attack, release):
    e, out = 0., np.empty(len(x))
    for i in range(len(x)):
        out[i] = e
        e += (x[i] - e) * (attack if x[i] > e else release)
    return out


def roll_off(x):
    return signal.sosfilt(signal.butter(12, 16650, fs=SR, output="sos"), x)


def record(dry):
    peak = follow(np.abs(dry).max(axis=0), 1 / (0.00097 * SR), 1 / (0.022 * SR))
    gain = np.minimum(elevation(-7.0) / (peak + 1e-9), 1) ** 0.94
    gain = uniform_filter1d(np.roll(gain, int(0.00044 * SR)), size=40)
    overload = np.tanh(dry * gain * 0.95)
    mix = shape(overload, [20, 60, 120, 200, 11000, 14000, 16500], [-28, -21, -9.5, -1.0, 1.5, 0.0, -18])
    return roll_off(np.clip(mix, -.97, .97))


dry = scene()
out = record(dry)
int16_out(out)
```